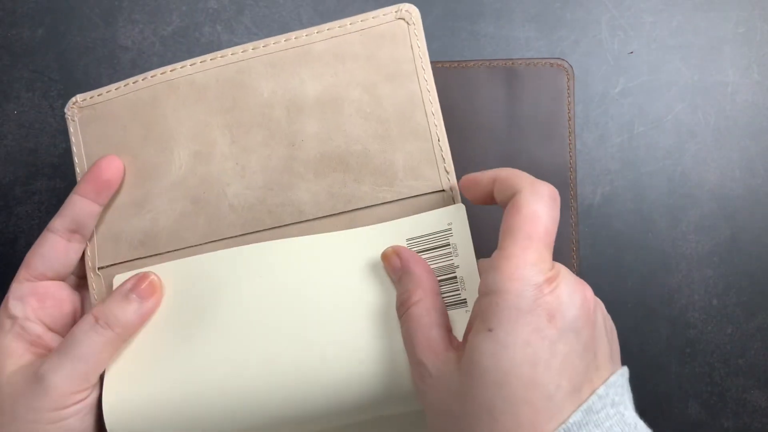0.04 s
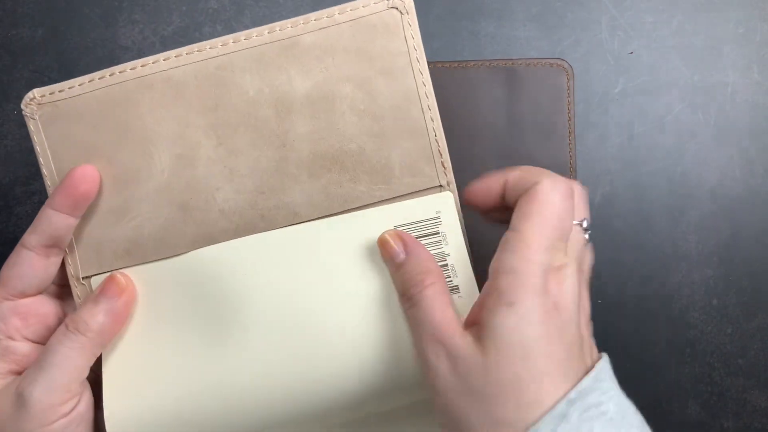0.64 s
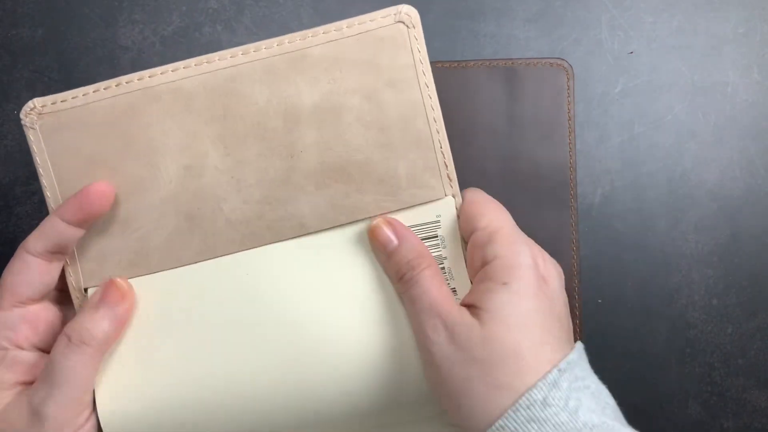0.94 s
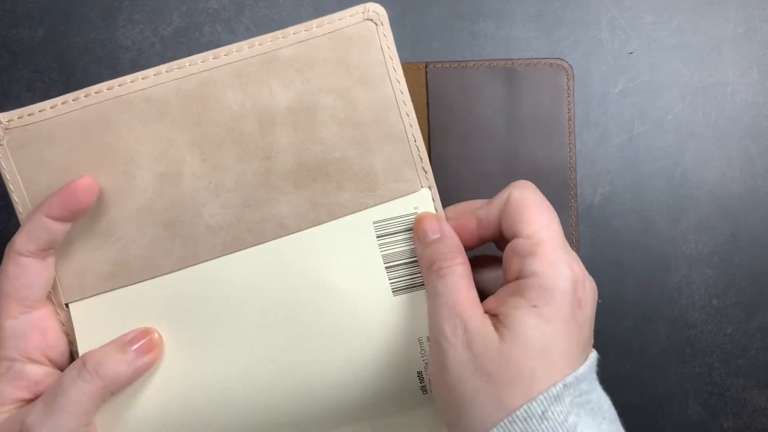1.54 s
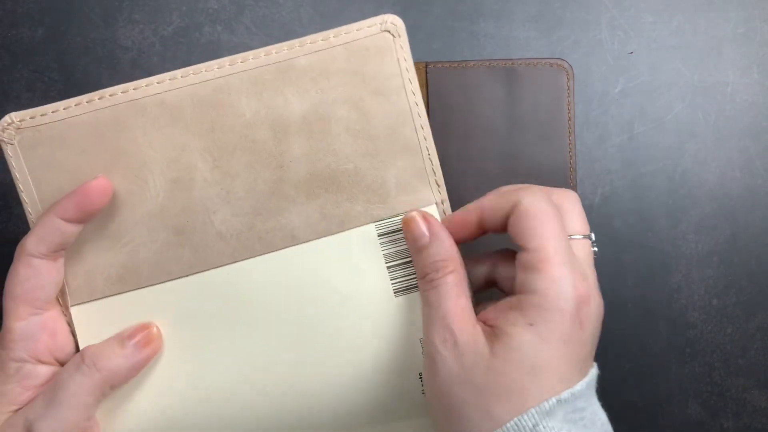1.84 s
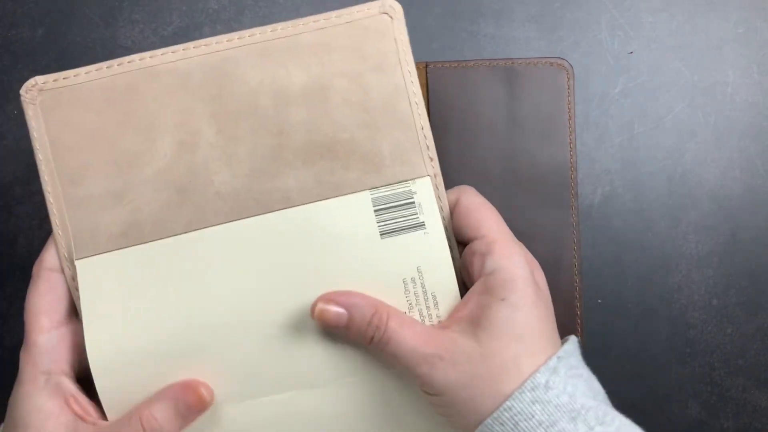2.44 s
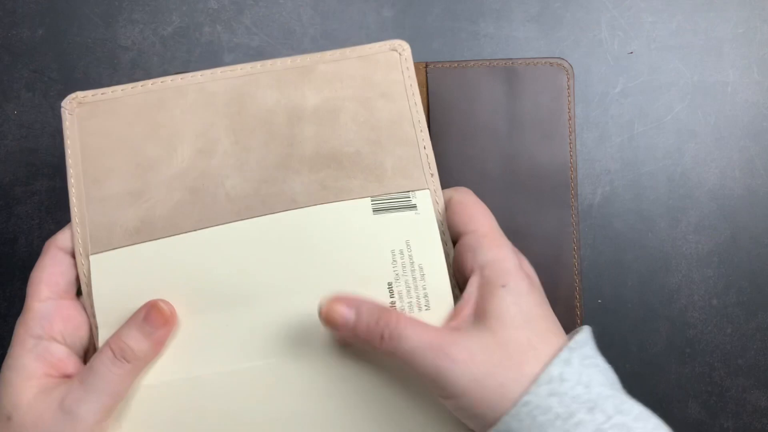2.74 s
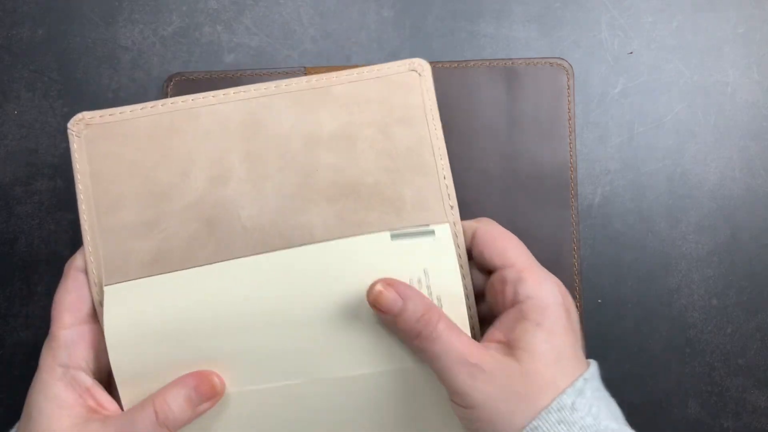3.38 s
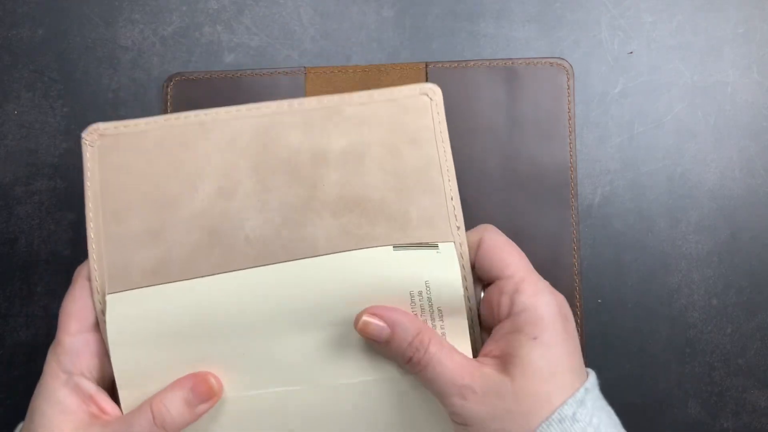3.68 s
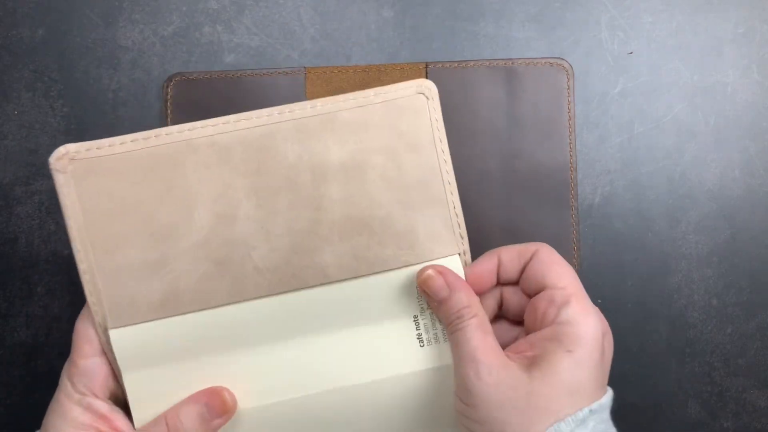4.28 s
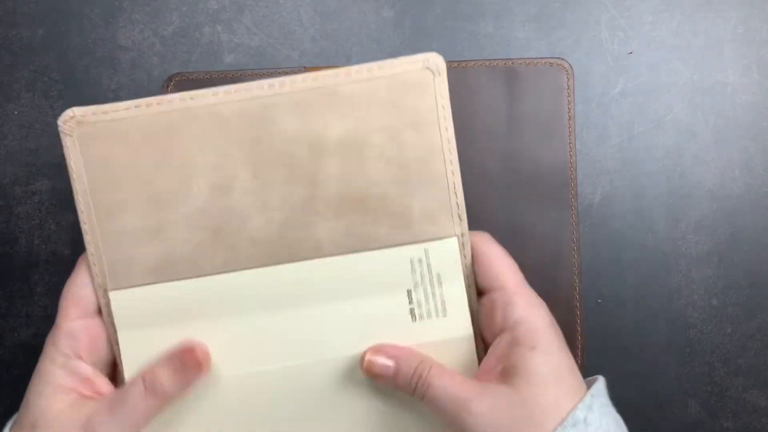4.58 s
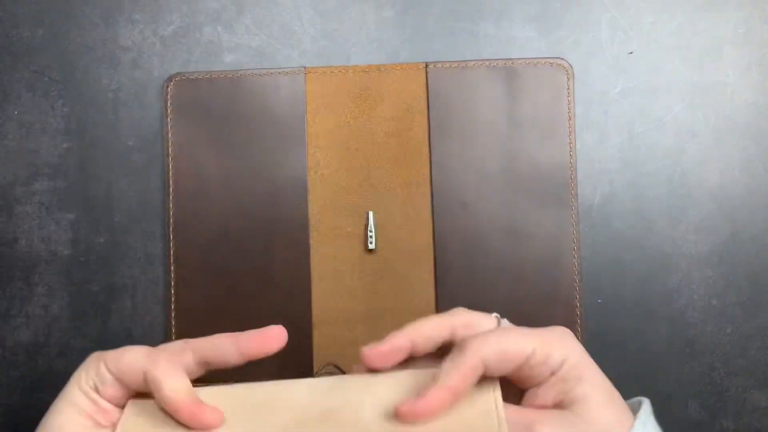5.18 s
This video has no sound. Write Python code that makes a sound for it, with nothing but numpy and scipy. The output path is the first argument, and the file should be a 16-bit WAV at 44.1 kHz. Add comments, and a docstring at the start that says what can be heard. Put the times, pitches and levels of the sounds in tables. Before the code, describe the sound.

Card rubs and rustles against leather up close, broken by bumps, small clicks and one hard knock near the end.

```python
"""A paper notebook is worked into the pocket of a leather cover, close to two spaced microphones in a
small room. The leather squeaks, then card drags on it in short pushes, jams and lets go with a dull
knock at 0.8 s. Rubbing goes on amid bumps, paper snaps and nail clicks; a finger scrapes near 1.8 s and
the card sweeps in around 2.4 s. The hardest knock comes at 4.2 s and a paper corner flicks free.
At 4.7 s the card swishes the last of the way in, and fingertips brush the cover."""
import sys
import numpy as np
from scipy import signal
from scipy.fft import rfft, irfft, next_fast_len
from scipy.io import wavfile
from scipy.ndimage import uniform_filter1d, map_coordinates

SR = 44100
rng = np.random.default_rng(int(sys.argv[2]) if len(sys.argv) > 2 else 0)


def to_wav(s):
    """Save 16-bit WAV."""
    ch = np.atleast_2d(s).T  # columns
    pcm = np.round(np.clip(ch, -1, 1) * 32767)  # PCM
    wavfile.write(sys.argv[1], SR, pcm.astype(np.int16))


N = 234656

# notebook bumps in the pocket: start_s, level_db, pitch_hz, t60_s, cover_ring_db, thud_db
KNOCKS = [(0.467, -24.5, 494, 0.01, -25, -27), (0.5, -21.5, 422, 0.011, -8, -25),
          (0.667, -33, 790, 0.028, -12, -22), (0.703, -34, 895, 0.018, -14, -23),
          (0.712, -31.5, 940, 0.034, -1, -20), (0.7993, -7, 916, 0.035, 0, -8),
          (0.8007, -4, 547, 0.01, -27, -26), (0.909, -22, 219, 0.0066, -18, -16),
          (1.156, -26, 322, 0.03, -4, -1), (1.297, -29, 810, 0.027, -0.5, 0),
          (1.586, -30.5, 486, 0.029, -23, -21), (1.741, -27, 464, 0.04, -19, -17),
          (2.082, -24.5, 850, 0.015, -11, -20), (2.099, -25.5, 686, 0.017, -17, -10),
          (2.143, -30, 524, 0.02, -3, -12), (2.724, -32, 653, 0.017, 4, -17),
          (2.775, -24, 484, 0.022, 0, -32), (2.785, -17.5, 670, 0.028, -11, -23),
          (2.793, -16, 690, 0.0065, -4.5, -22), (2.877, -28, 553, 0.012, -14, -4),
          (2.888, -25.5, 536, 0.0071, -7, -14), (2.923, -25, 980, 0.012, -12, -26),
          (3.259, -24.5, 202, 0.047, -11, -14), (3.457, -27.5, 633, 0.041, -23, -7),
          (3.468, -24, 794, 0.03, -24, -2), (3.849, -18, 406, 0.03, 0.5, -12),
          (3.855, -21, 197, 0.074, -14, -15), (3.87, -11, 1150, 0.034, -3.5, -10),
          (4.045, -30, 1150, 0.014, -4, -24), (4.178, 2.5, 450, 0.01, -21.5, -50),
          (4.274, -26, 555, 0.0067, 4, -16), (4.284, -25, 654, 0.027, -11, -20),
          (4.504, -13.5, 680, 0.0072, -12, -4), (4.5074, -18, 450, 0.019, -6, -19),
          (4.5117, -11.5, 482, 0.0049, -12.5, -22), (4.515, -18.5, 950, 0.013, -1, -34),
          (4.758, -27, 627, 0.044, -1, -25)]


def amp(db):
    """Decibels to gain."""
    return 10 ** (np.asarray(db) / 20)


def unit(x):
    """Scale to rms 1."""
    return x / np.sqrt(np.mean(x ** 2) + 1e-20)


def unit_peak(x):
    """Scale to peak 1."""
    return x / np.abs(x).max()


def along(points, hz):
    """Interpolate (freq_hz, value) points on a log axis."""
    freq_hz, values = np.transpose(points)
    return np.interp(np.log(hz + 1), np.log(freq_hz + 1), values)


def wobble(rate_hz):
    """Smooth random curve, rate_hz knots a second."""
    knots = rng.standard_normal(int(N * rate_hz / SR) + 4)
    return map_coordinates(knots, [np.arange(N) * rate_hz / SR])


def filtered(x, response):
    """Apply a complex frequency response."""
    n = x.shape[-1]
    size = next_fast_len(n + 8192)
    return irfft(rfft(x, size) * response(np.fft.rfftfreq(size, 1 / SR)), size)[..., :n]


def add(track, start_s, sound):
    """Mix a sound into a track."""
    part = track[..., max(round(start_s * SR), 0):][..., :sound.shape[-1]]
    part += sound[..., :part.shape[-1]]


def coloured(pair, spectrum):
    """Two unrelated signals become partly correlated stereo with this spectrum, rms 1."""
    # left-right likeness: freq_hz, correlation
    likeness = [(100, 0.9), (700, 0.7), (2000, 0.65), (5000, 0.54), (14000, 0.081)]

    def response(hz):
        angle = np.arccos(np.clip(along(likeness, hz), -1, 1)) / 2
        return amp(along(spectrum, hz)) * [np.cos(angle), np.sin(angle)]
    mid, side = filtered(pair, response)
    return unit(np.array([mid + side, mid - side]))


def noise(n, spectrum):
    """Coloured stereo noise, rms 1."""
    return coloured(rng.standard_normal((2, n)), spectrum)


def patchy(x, depth_db):
    """Contact points wander, so the colour keeps shifting."""
    bins = signal.stft(x, nperseg=512)[2]
    field = uniform_filter1d(rng.standard_normal(bins.shape[1:]), size=6, axis=0)
    field = uniform_filter1d(field, size=14, axis=1)
    return signal.istft(bins * amp(depth_db * unit(field)), nperseg=512)[1][:, :N]


def friction(spectrum, slips_per_s, grain_db, judder_db, judder_hz):
    """Fibres catch and let go: single slips on a bed of tiny ones, clumped by hand judder."""
    slips = (rng.random(N) < slips_per_s / SR) * rng.standard_normal((2, N))
    force = rng.standard_normal((2, N)) + amp(grain_db) * unit(slips)
    force *= amp(judder_db * wobble(judder_hz))
    return coloured(patchy(force, depth_db=3.0), spectrum)


def swelling(strokes, roundness=1.43):
    """Each rub speeds up, crests and fades; width_s is taken at half speed. One gain per level column."""
    t = np.arange(N) / SR
    power = np.zeros((len(strokes[0]) - 2, N))
    for crest_s, width_s, *levels_db in strokes:
        near = np.abs(t - crest_s) < 4 * width_s
        speed = .5 ** (np.abs(2 * (t[near] - crest_s) / width_s) ** roundness)
        power[:, near] += np.outer(amp(levels_db), speed) ** 2
    return np.sqrt(power)


def room_air():
    """Quiet air, mostly bass."""
    # air spectrum: freq_hz, level_db
    spectrum = [(20, 2), (60, -3), (150, -3), (700, -27), (2000, -17), (8000, -32.5), (16000, -67)]
    return amp(-55.0) * noise(N, spectrum)


def room(x):
    """Wall reflections, 5 ms late; the treble dies first."""
    # room decay: freq_hz, t60_s
    decay = [(150, 0.14), (600, 0.13), (3000, 0.14), (12000, 0.067)]
    hz, t, bins = signal.stft(rng.standard_normal((2, SR // 2)), SR, nperseg=256)
    tail = signal.istft(bins * amp(-60 * t / along(decay, hz)[:, None]), SR, nperseg=256)[1]
    delayed = np.pad(x, ((0, 0), (220, 0)))
    return signal.fftconvolve(delayed, tail / np.linalg.norm(tail[0]), axes=1)[:, :N]


def microphones(x):
    """Bass reaches both capsules together; above it the left leads."""
    # channel balance: freq_hz, left_minus_right_db
    balance = [(60, -0.5), (92, -2.5), (140, -5), (210, -0.5), (330, -6), (500, -2), (770, -6.5),
               (1170, -3.5), (1790, 0), (2740, 3), (4190, 2), (6410, 0.5), (9810, 0.5), (15000, -0.5)]
    # phase lead of the left capsule: freq_hz, lead_rad
    lead = [(0, 0), (780, 0), (1130, 1.3), (1400, 3.5), (16600, 84)]

    def response(hz):
        left = amp(along(balance, hz) / 2) * np.exp(.5j * np.interp(hz, *np.transpose(lead)))
        return np.array([left, 1 / left])
    return filtered(x, response)


def bending(drag_gain, rest_db=-52.5, pull_db=-17.5, rise_s=0.0026, t60_s=0.41):
    """The cover rumbles as it bends: it gives after each knock and is pulled by the drag."""
    # rumble spectrum: freq_hz, level_db
    spectrum = [(15, -16), (30, -7), (57, 9.5), (90, -1), (170, -5), (260, -8.5), (500, -32.5)]
    gain, t = np.zeros(N), np.arange(SR // 2) / SR
    give = (1 - np.exp(-t / rise_s)) * amp(-60 * t / t60_s)
    for start_s, knock_db, *_ in KNOCKS:
        span = slice(round(start_s * SR), round(start_s * SR) + len(t))
        gain[span] = np.maximum(gain[span], amp(-34 + 0.44 * knock_db) * give)
    gain = np.hypot(np.hypot(gain, amp(rest_db)), amp(pull_db) * drag_gain)
    return gain * friction(spectrum, 36, grain_db=-21, judder_db=0.9, judder_hz=17)


def fingertips():
    """Skin brushes smoothly over the cover."""
    # finger strokes: crest_s, width_s, level_db
    strokes = [(4.12, 0.065, -38), (4.86, 0.081, -37.5), (5.02, 0.14, -43)]
    # skin on leather: freq_hz, level_db
    spectrum = [(900, -42), (1150, -22), (1380, -1), (1580, 5.5), (1850, -2), (2150, 2), (2500, -6),
                (2900, -14), (3600, -16), (4400, -19), (5200, -19), (8000, -31)]
    return swelling(strokes) * friction(spectrum, 370, grain_db=-28, judder_db=1.5, judder_hz=25)


def broad_scrapes():
    """Broad scrapes on leather: a finger near 1.8 s, then the card sweeping in around 2.4 s."""
    # scrapes: crest_s, width_s, level_db
    scrapes = [(1.785, 0.084, -40), (2.355, 0.093, -32.5), (2.468, 0.089, -28.5)]
    # scrape spectrum: freq_hz, level_db
    spectrum = [(350, -12), (690, 10), (850, -0.5), (1100, 12), (1350, -2), (1560, 10), (1780, -5),
                (2000, 7), (2300, -6), (2600, 1), (3100, -10), (3900, -10), (4500, -3), (5400, 1),
                (6400, -15), (12000, -33)]
    return swelling(scrapes) * friction(spectrum, 900, grain_db=-12, judder_db=1.0, judder_hz=110)


def card_edge():
    """The cut edge rasps along the pocket seam."""
    # rasps: crest_s, width_s, level_db
    rasps = [(2.345, 0.06, -46), (2.475, 0.07, -38.5), (4.805, 0.08, -38.5)]
    # edge on seam: freq_hz, level_db
    spectrum = [(2500, -30), (3800, -12), (4400, 5), (4900, 1), (5500, 1), (6200, -18), (7200, -9),
                (10000, -30)]
    return swelling(rasps) * friction(spectrum, 800, grain_db=-7, judder_db=4.0, judder_hz=89)


def swishes(rise_s=0.0053):
    """The card breaks loose, slides steadily and slows to a stop."""
    # final slip: start_s, level_db, hold_s, t60_s
    events = [(4.72, -36, 0.12, 0.21)]
    # slipping card: freq_hz, level_db
    spectrum = [(700, -15), (1200, -9), (1550, 11.5), (1800, 2), (2050, 10), (2900, -4), (3500, -3),
                (4400, 2), (5500, -1), (6100, -19), (7000, -5), (9000, -12), (14000, -33)]
    gain, t = np.zeros(N), np.arange(SR // 2) / SR
    for start_s, level_db, hold_s, t60_s in events:
        fade = amp(level_db - 60 * np.maximum(t - hold_s, 0) / t60_s)
        add(gain, start_s, fade * (1 - np.exp(-t / rise_s)))
    return gain * friction(spectrum, 900, grain_db=4, judder_db=-0.5, judder_hz=65)


def squeaks(waver=0.07, flutter_db=2.0):
    """Sticking leather chatters briefly at unsteady pitch and strength."""
    # squeaks and groans: start_s, length_s, pitch_hz, level_db
    events = [(0.008, 0.019, 904, -22.5), (0.021, 0.02, 946, -24), (0.034, 0.03, 925, -23.5),
              (0.055, 0.043, 926, -33.5), (0.52, 0.098, 155, -46.5), (2.799, 0.045, 595, -41),
              (3.35, 0.14, 170.4, -46), (4.083, 0.073, 1537, -31.5)]
    out = np.zeros(N)
    for start_s, length_s, pitch_hz, level_db in events:
        n = int(length_s * SR)
        phase = 2 * np.pi * np.cumsum(pitch_hz * (1 + waver * wobble(362)[:n])) / SR
        grip = amp(level_db + flutter_db * wobble(264)[:n]) * signal.windows.tukey(n, .7)
        add(out, start_s, grip * (np.sin(phase) + 0.07 * np.sin(2 * phase)))
    return out


def clicks(rise_s=0.00015):
    """Nails and stiff corners hit the paper: tiny hard contacts, short bright cracks."""
    # contacts: start_s, level_db, pitch_hz, t60_s
    events = [(0.4968, -19, 11500, 0.014), (0.5005, -25, 8000, 0.016), (2.7258, -27, 11000, 0.011),
              (2.921, -22, 9500, 0.008), (2.934, -17.5, 13000, 0.006), (3.0038, -33, 11500, 0.012),
              (3.099, -26.5, 9000, 0.053), (3.869, -20, 11500, 0.0083), (4.618, -29, 9000, 0.012),
              (4.732, -22, 9500, 0.012)]
    # click spectrum: pitch_ratio, level_db
    shape = [(0.15, -6), (0.5, -6), (1, -1), (1.4, -2), (2, -16)]
    out, t = np.zeros((2, N)), np.arange(SR // 16) / SR
    for start_s, level_db, pitch_hz, t60_s in events:
        crack = noise(len(t), [(ratio * pitch_hz, db) for ratio, db in shape])
        add(out, start_s, amp(level_db - 11 - 60 * t / t60_s) * (1 - np.exp(-t / rise_s)) * crack)
    return out


def flicks(build_t60_s=0.0093, fade_t60_s=0.011, flutter_t60_s=0.053, travel_s=0.0035, travel_hz=1000):
    """A taut paper corner scrapes over the pocket lip and flicks free; bending waves bring treble first."""
    # flick: release_s, scrape_db, release_db
    events = [(4.268, -12, -7)]
    # paper corner: freq_hz, level_db
    spectrum = [(250, -0.5), (650, 8.5), (950, -1), (1200, -25), (1550, 6), (2900, 4.5), (3700, 4.5),
                (5700, -1.5), (7500, 4), (11000, -4.5), (15000, 1.5), (16300, 3), (16600, -24)]
    out, t = np.zeros((2, N)), np.arange(-SR // 50, SR // 8) / SR
    dispersion = lambda hz: np.exp(-4j * np.pi * travel_s * np.sqrt(travel_hz * hz))
    release = filtered(1. * (t == 0), lambda hz: amp(along(spectrum, hz)) * dispersion(hz))
    build = amp(-60 * np.abs(t) / build_t60_s)
    fade = amp(-60 * np.abs(t) / fade_t60_s) + amp(-15 - 60 * np.abs(t) / flutter_t60_s)
    for release_s, scrape_db, release_db in events:
        scrape = np.where(t < 0, build, fade) * noise(len(t), spectrum)
        add(out, release_s + t[0], amp(scrape_db) * scrape + amp(release_db) * unit_peak(release))
    return out


def snaps(rise_s=0.00068, scuff_db=-25, scuff_t60_s=0.036, tick_db=3, tick_t60_s=0.00036):
    """A paper edge springs free: tick, crisp crack, lower flap of the sheet, then a faint scuff."""
    # edge snaps: start_s, level_db, flap_db, flap_hz, t60_s
    events = [(0.094, -23, 3, 1100, 0.045), (0.445, -28.5, 12, 920, 0.036), (0.468, -18.5, -7, 990, 0.016),
              (0.497, -19.5, -3.5, 1010, 0.023), (0.751, -28.5, 2.5, 880, 0.051),
              (0.779, -30, 9, 2300, 0.031), (0.787, -24, 8, 800, 0.032), (0.8, -12.5, 11, 2530, 0.016),
              (1.045, -25, 3, 1000, 0.027), (1.157, -24, -15, 1200, 0.035), (1.297, -22.5, -7, 1000, 0.034),
              (1.607, -21, 2.5, 1080, 0.039), (1.817, -15.5, -2.5, 1110, 0.056),
              (1.8192, -14.5, 4, 3160, 0.028), (2.098, -34.5, 17.5, 1810, 0.0088),
              (2.726, -23, 0, 2000, 0.011), (2.773, -20, -4, 1730, 0.12), (2.889, -26, -10, 1200, 0.008),
              (2.922, -22.5, 10, 1040, 0.016), (2.934, -25.5, 4.5, 1790, 0.023),
              (3.139, -34, -5, 1400, 0.055), (3.458, -30.5, 16, 1010, 0.014), (3.838, -18, 3, 900, 0.02),
              (3.868, -12, 4.5, 2020, 0.027), (4.1759, -23.5, 21.5, 1700, 0.013),
              (4.1794, -27.5, 19, 1960, 0.015), (4.2454, -20.5, 2, 2130, 0.047),
              (4.2613, -23, 6, 1790, 0.027), (4.351, -26, 4, 1794, 0.011), (4.482, -23, 14, 2040, 0.013),
              (4.618, -32.5, 4, 805, 0.02), (4.732, -15.5, -5, 2100, 0.018), (4.744, -20.5, 7, 6500, 0.014),
              (4.758, -20, 4.5, 6570, 0.019)]
    # crack spectrum: freq_hz, level_db
    crisp = [(1200, 1.5), (3000, 1), (4500, 6.5), (6300, -3.5), (9000, 0), (15000, -10.5)]
    # flap spectrum: pitch_ratio, level_db
    flap_shape = [(0.25, -14), (0.65, -6.5), (1, 3.5), (1.4, -9.5), (2.1, -17.5), (3.6, -34)]
    out, t = np.zeros((2, N)), np.arange(SR // 5) / SR
    attack = 1 - np.exp(-t / rise_s)
    tick = amp(tick_db - 60 * np.abs(t - 2 * rise_s) / tick_t60_s)
    for start_s, level_db, flap_db, flap_hz, t60_s in events:
        envelope = attack * (amp(-60 * t / t60_s) + amp(scuff_db - 60 * t / scuff_t60_s))
        crack = amp(-9) * (envelope + tick) * noise(len(t), crisp)
        flap_spectrum = [(ratio * flap_hz, db) for ratio, db in flap_shape]
        flap = amp(flap_db - 7.0) * envelope * noise(len(t), flap_spectrum)
        add(out, start_s, amp(level_db) * (crack + flap))
    return out


def knocks(rise_s=0.00049, settle_t60_s=0.037, thud_s=0.0014, corner_hz=142):
    """Each bump: a damped swing of the struck spot, a dull push of air and the ring of the cover."""
    # modes of the filled cover: freq_hz, width_hz, level_db
    modes = [(170, 22, -46), (355.7, 28, 4), (475, 31, 0), (652, 49, 1.5), (840, 52, -31), (1157, 170, -11),
             (1585, 60, -2.5), (2020, 55, -32)]

    def cover(hz):
        return sum((-1) ** k * amp(db) * 1j * hz * width_hz / (mode_hz ** 2 - hz ** 2 + 1j * hz * width_hz)
                   for k, (mode_hz, width_hz, db) in enumerate(modes))
    out, t = np.zeros((2, N)), np.arange(SR // 5) / SR
    u = t / thud_s
    thud = unit_peak(-u * (2 - u) * np.exp(-u))
    attack = 1 - np.exp(-t / rise_s)
    for start_s, level_db, pitch_hz, t60_s, ring_db, thud_db in KNOCKS:
        swing = unit_peak(-np.sin(2 * np.pi * pitch_hz * t) * amp(-60 * t / t60_s) * attack)
        contacts = 0.1 * rng.standard_normal(len(t)) * amp(-60 * t / settle_t60_s)  # leaves settle
        contacts[0] = -1  # the blow
        ring = unit_peak(filtered(contacts, cover))
        add(out, start_s, amp(level_db - 2.5) * (swing + amp(ring_db) * ring + amp(thud_db) * thud))
    # a small cover radiates little bass
    return signal.sosfilt(signal.butter(2, corner_hz, "highpass", fs=SR, output="sos"), out)


def pocket_ring(width_hz=320):
    """Broad air resonance: it rises as the notebook fills the pocket, then is shut in."""
    # pocket air: time_s, pitch_hz, level_db
    glide = [(0, 922, 2.5), (0.7, 825.7, -3.5), (2.24, 954, -1.5), (2.35, 1083, 11.5), (2.5, 1078, 1),
             (2.75, 1061, -4.5), (3.6, 1169, 0), (4.4, 1232, -12)]
    time_s, pitch_hz, level_db = np.transpose(glide)
    t = np.arange(N) / SR
    phase = 2 * np.pi * np.cumsum(np.interp(t, time_s, pitch_hz)) / SR
    ring = unit(wobble(width_hz) * np.cos(phase) + wobble(width_hz) * np.sin(phase))
    return amp(np.interp(t, time_s, level_db) - 4.5) * ring


def jamming(edge_s=0.003):
    """Gain of the sliding: quick dips while the card sticks; the last entry is a slight lift."""
    # jams: start_s, length_s, gain_db
    jams = [(0.484, 0.016, -3), (0.604, 0.036, -5), (0.645, 0.12, -2), (1.35, 0.12, -0.5),
            (2.935, 0.013, -4), (3.115, 0.022, -7), (3.976, 0.062, 1.5)]
    t = np.arange(N) / SR
    step = lambda at_s: np.tanh((t - at_s) / edge_s) / 2
    return amp(sum(db * (step(start_s) - step(start_s + length_s)) for start_s, length_s, db in jams))


def sliding(drag_floor_db=-51, hiss_floor_db=-58.5):
    """Card drags on leather in short rubs: fibres hiss, the pocket rings, the cover bends."""
    # rubs: crest_s, width_s, drag_db, hiss_db, fizz_db
    strokes = [(0.035, 0.037, -29, -34.5, -42.5), (0.074, 0.05, -37, -41, -40),
               (0.193, 0.11, -44.5, -44, -44), (0.444, 0.061, -37, -36.5, -38),
               (0.55, 0.058, -47, -51, -46), (0.725, 0.13, -41, -50, -54),
               (0.793, 0.029, -33.5, -31, -31.5), (0.831, 0.08, -36, -39, -41),
               (0.917, 0.058, -39, -35.5, -43), (1.005, 0.054, -42, -44, -45.5),
               (1.061, 0.042, -36, -40.5, -46), (1.162, 0.08, -34.5, -35, -36),
               (1.25, 0.15, -44.5, -42, -42.5), (1.511, 0.17, -44.5, -45, -46.5),
               (1.62, 0.061, -37.5, -38.5, -45), (1.755, 0.078, -34.5, -39, -44.5),
               (1.83, 0.056, -35, -35.5, -37), (1.923, 0.053, -45.5, -41, -43.5),
               (2.023, 0.096, -36, -40, -40.5), (2.166, 0.073, -38.5, -39.5, -39),
               (2.228, 0.07, -38.5, -42.5, -44), (2.355, 0.098, -36.5, -33.5, -40),
               (2.472, 0.093, -33, -34, -33.5), (2.59, 0.13, -45, -39.5, -42),
               (2.718, 0.083, -36.5, -45.5, -46.5), (2.806, 0.042, -38, -39, -38),
               (2.872, 0.09, -39, -40, -37), (2.918, 0.03, -42, -37, -46), (3.025, 0.06, -43, -41, -38.5),
               (3.075, 0.057, -40, -42.5, -61), (3.16, 0.047, -64, -39, -39),
               (3.208, 0.075, -39, -36.5, -39.5), (3.297, 0.052, -54, -45, -42),
               (3.392, 0.069, -52.0, -41.5, -39), (3.489, 0.081, -37, -42.5, -41.5),
               (3.606, 0.14, -45.5, -42, -47.5), (3.74, 0.039, -43, -39.5, -43),
               (3.803, 0.05, -50, -42.5, -40), (3.886, 0.085, -38.5, -40, -44),
               (4.123, 0.068, -33.5, -35, -36), (4.28, 0.041, -46, -46, -35),
               (4.386, 0.15, -43.5, -40, -38.5), (4.523, 0.066, -36, -49, -50),
               (4.667, 0.04, -48.5, -46.5, -49), (4.8, 0.1, -41, -43, -37), (5.11, 0.1, -54, -43, -44),
               (5.269, 0.26, -64, -53.5, -45)]
    # spectra of leather drag, paper hiss and fine fizz: freq_hz, level_db
    leather = [(120, -22), (250, -9), (360, 0.5), (520, 1), (680, 1), (800, -5.5), (950, -7.5), (1150, -1),
               (1350, -8.5), (1800, -16.5), (2400, -4), (4000, -62)]
    paper = [(600, -21), (1200, -3), (1600, 5.5), (2050, 0.5), (2650, -2), (3100, 0), (4400, -0.5),
             (5500, -1.5), (6400, -24), (9000, -55)]
    fine = [(4000, -3), (6000, 3.5), (7500, 3), (9500, 5), (12500, 0.5), (15900, 2), (16600, -62)]
    drag_gain, hiss_gain, fizz_gain = swelling(strokes)
    drag_gain = np.hypot(drag_gain, amp(drag_floor_db))  # hands never hold quite still
    hiss_gain = np.hypot(hiss_gain, amp(hiss_floor_db))
    speed = unit(np.sqrt(hiss_gain))  # faster strokes meet more fibres a second
    drag = amp(-2.5) * friction(leather, 160 * speed, grain_db=-11.5, judder_db=2.5, judder_hz=68)
    ring = pocket_ring()
    hiss = amp(-1.4) * friction(paper, 400 * speed, grain_db=-8.5, judder_db=2.0, judder_hz=95)
    fizz = amp(-1.07) * friction(fine, 700 * speed, grain_db=-7.5, judder_db=1.4, judder_hz=69)
    rub = drag_gain * (drag + ring) + hiss_gain * hiss + fizz_gain * fizz
    return jamming() * rub + bending(drag_gain)


def scene():
    """Blows and rubbing, with the room and its air."""
    blows = knocks() + snaps() + clicks() + flicks()
    rubbing = sliding() + fingertips() + broad_scrapes() + card_edge() + swishes() + squeaks()
    handling = blows + rubbing
    return microphones(handling + room_air()) + room(amp(-12.5) * handling)


def record(dry):
    """Clip at full scale, then cut above 16.6 kHz."""
    return filtered(np.clip(dry, -1, 1), lambda hz: hz < 16600)


dry = scene()
out = record(dry)
to_wav(out)
```